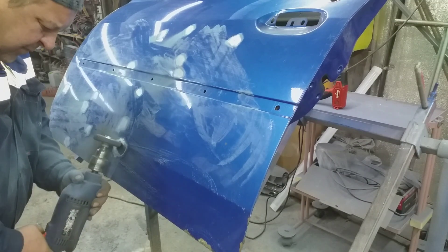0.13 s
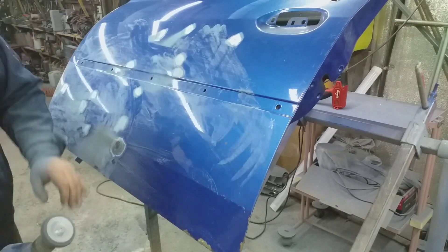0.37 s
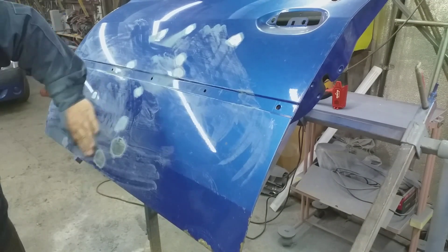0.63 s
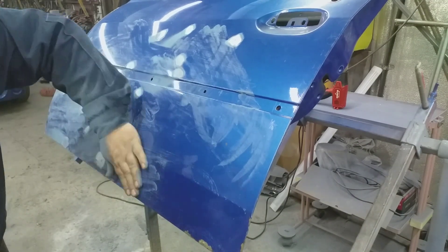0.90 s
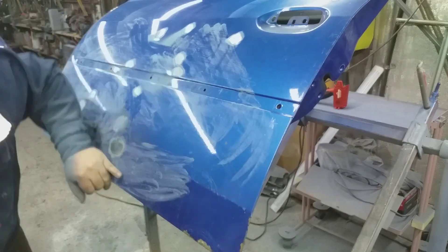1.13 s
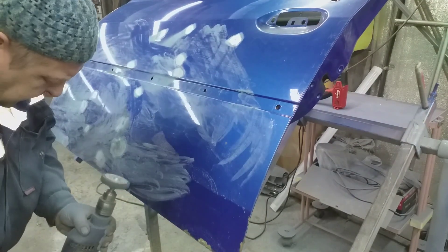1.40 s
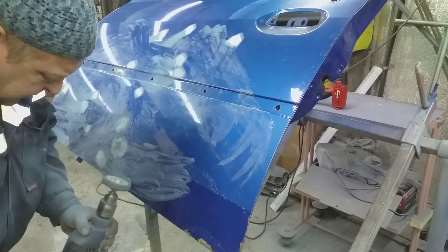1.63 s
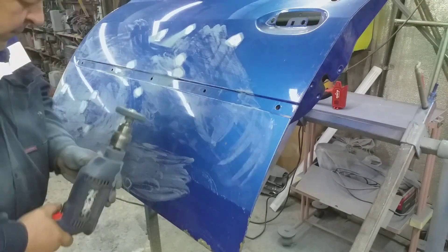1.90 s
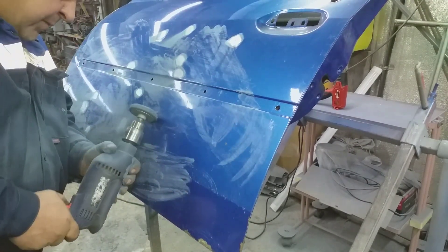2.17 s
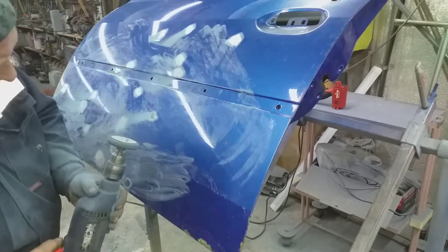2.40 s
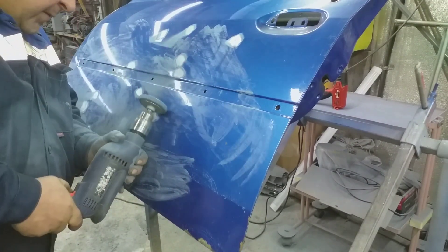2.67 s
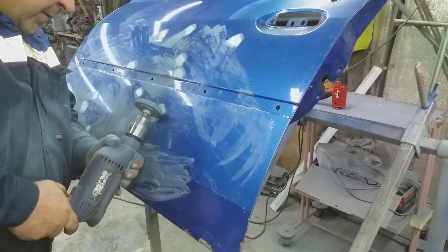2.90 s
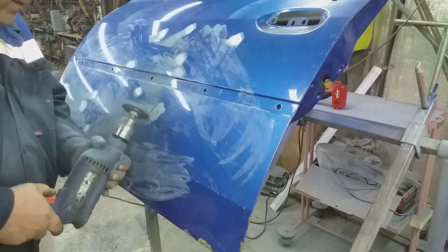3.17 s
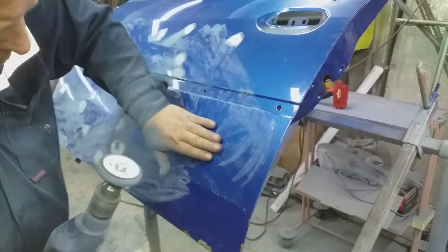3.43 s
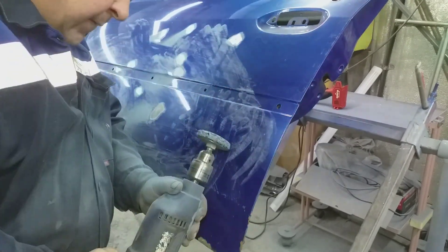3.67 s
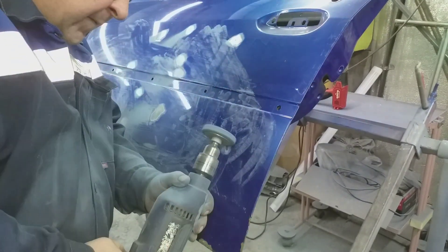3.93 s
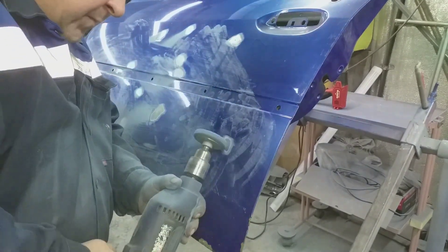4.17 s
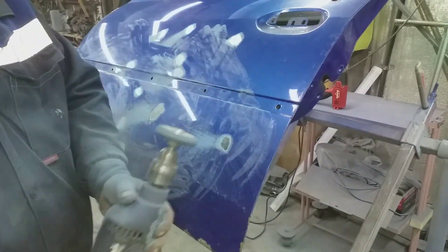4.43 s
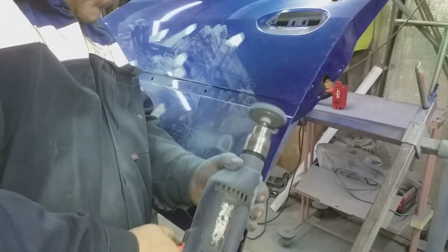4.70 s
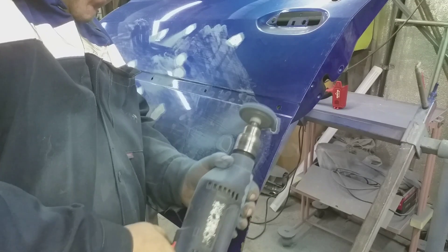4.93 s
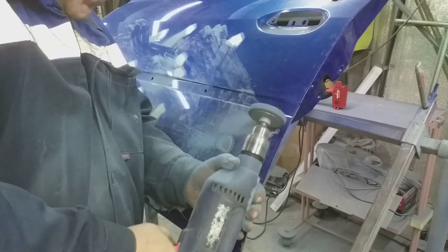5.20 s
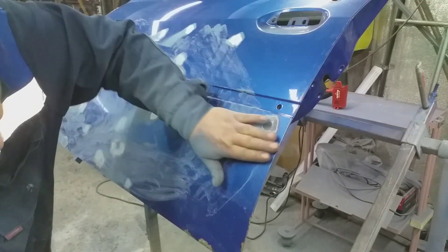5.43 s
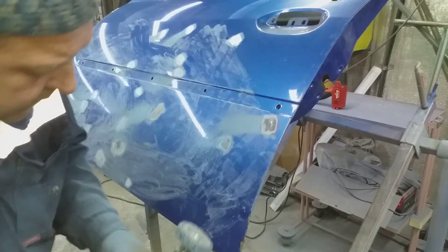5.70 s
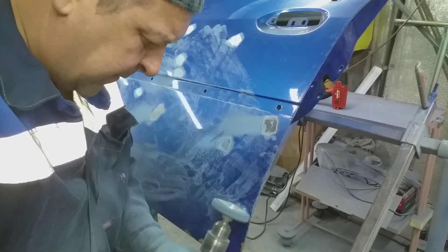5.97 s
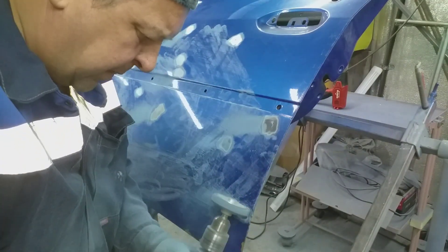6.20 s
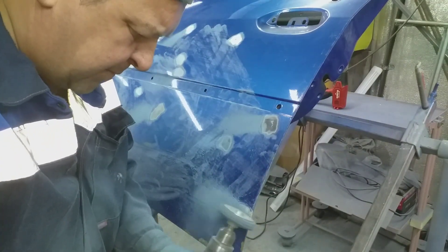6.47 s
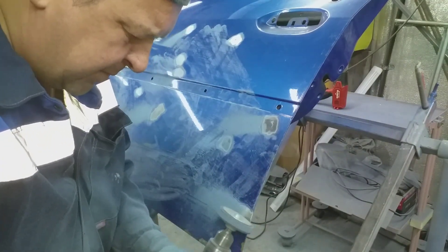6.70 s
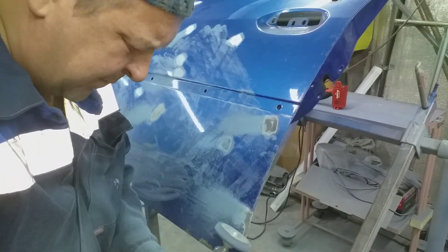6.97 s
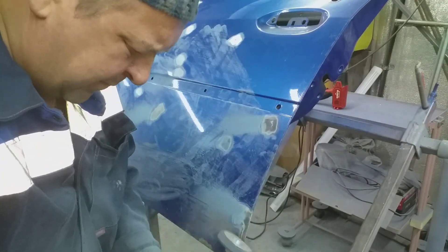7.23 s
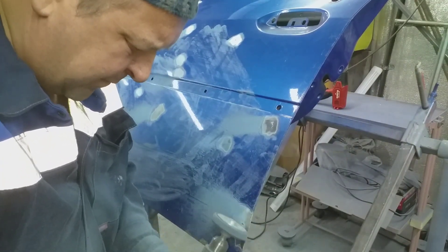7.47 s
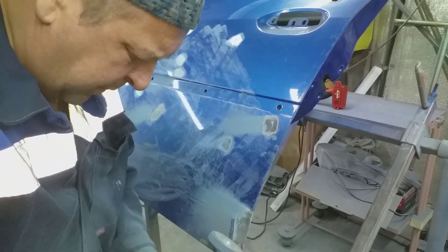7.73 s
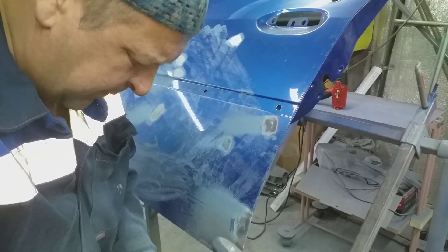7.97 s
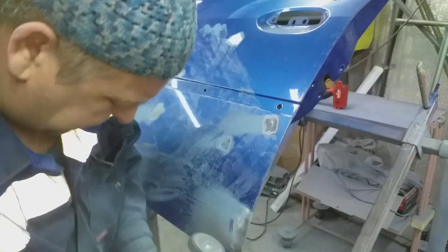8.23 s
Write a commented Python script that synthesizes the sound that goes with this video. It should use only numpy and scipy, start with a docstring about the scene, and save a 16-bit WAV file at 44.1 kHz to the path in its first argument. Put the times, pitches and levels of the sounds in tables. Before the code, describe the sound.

Close in a quiet workshop, an electric drill roars in short bursts, its fan hiss and thin high whistle surging at each start. The disc makes a steel door panel drum and rasp low underneath. After each release the pitch slides down and fades while a palm softly wipes dust. The later bursts are longer and closer together. The sped-up sound has a fine, rapid flutter.

```python
"""Hand drill grinding a door panel

A drill with an abrasive disc grinds spots on a steel door panel in short bursts, played faster than life.
Rotor: fan hiss through the housing, brush sizzle, blade whistle and gear tones that follow the speed. Panel:
modes and rasp driven by noise. Between bursts a palm wipes off dust and the motor blips once; trigger clicks;
workshop hush. The speed-up joins short slices of sound, so the level flutters at the slice rate."""
import sys
import numpy as np
from scipy import signal
from scipy.fft import rfft, irfft, next_fast_len
from scipy.io import wavfile
from scipy.ndimage import map_coordinates

SR = 44100
rng = np.random.default_rng(int(sys.argv[2]) if len(sys.argv) > 2 else 0)


def invert_db(level):
    """Linear amplitude ratio for a level in decibels (20 dB per decade), elementwise."""
    return 10 ** (np.asarray(level, dtype=float) / 20)


def generate_wav(signal):
    """Clip the signal to [-1, 1] and save it as 16-bit WAV at the path in sys.argv[1]."""
    frames = np.transpose(np.atleast_2d(signal))
    scaled = np.clip(frames, -1, 1) * 32767
    pcm = np.round(scaled).astype(np.int16)
    wavfile.write(sys.argv[1], SR, pcm)


N = 368669

# gear and commutator tones: cycles_per_turn, level_db (re power level), pitch_blur (share of pitch)
ROTOR_TONES = [(4, -6, .025), (8, -3, .02), (12, -5, .006), (48, -15, .002)]
# hiss coloured by the housing: freq_hz, density_db (relative)
HOUSING_SPECTRUM = [(760, -26), (1300, -5), (1380, -6), (1490, -5.5), (1890, -7), (2230, -7), (2690, -3),
                    (3740, -0.5), (4400, 1), (4820, 0), (5490, -1), (6010, -2), (7140, -3), (7810, -2.5),
                    (9200, -16.5), (12000, -48), (20200, -120)]
# housing resonances: freq_hz, width_hz, peak_gain_db (mean, re hiss)
HOUSING_RINGS = [(2800, 180, -8), (4350, 280, -7.5), (5210, 160, -13.5), (7860, 210, -10.5)]
# panel modes: freq_hz, width_hz (of each of two cascaded resonances), level_db, family (rounds to 0-3)
PANEL_MODES = [(162.1, 24, -7, 0), (204.8, 45, -1, -0.5), (257.8, 52, 1, 1), (336.3, 46.5, -4.5, 2),
               (382.4, 54.4, -2, 2), (433.3, 56, -2.5, 3), (503, 58, -4.5, 3), (655, 79, -11, 3),
               (939, 88, -24, 3)]
# spot under the disc, one row a touch: sway_db, then family_0_db .. family_3_db (relative balance)
TOUCH_SPOTS = [(-25.5, -9, -8.5, -5.5, -10.5), (-28, -15, -7.5, -3, -4), (-22, -12, -8.5, -4.5, -8.5),
               (-30, -11, -5.5, -10, -5.5), (-28, -8.5, -3.5, -4.5, -3.5), (-24.5, -11.5, -5.5, -6, -5),
               (-31, -10, -6, -3.5, -10.5), (-19, -6, -10, 0, -7.5), (-19, -7.5, -2, -6, -4),
               (-23, -6.5, -8.5, -8.5, -8), (-22, -7.5, -8, -3, -8), (-16.5, -6.5, -6.5, 0.5, -13.5),
               (-19, -15.5, -11, -3, -16.5), (-10.5, -7.5, -4.5, 0.5, -10), (-14.5, -7, -13, -1.5, -11.5),
               (-14, -3.5, -6.5, -4, -8.5), (-17.5, -7, -10, -3.5, -5.5), (-16, -7, -13, -7, -20)]
# brief disc snags: nominal_s, level_db (before trim), length_s
DISC_SNAGS = [(6.453, -13.5, 0.05), (6.561, -20, 0.025), (6.66, -13, 0.061), (7.221, -11, 0.045),
              (8.004, -9.5, 0.036)]
# palm strokes, plus one brief motor blip (the 5.759 s row): nominal_s, level_db (before low trim), treble_db
# (re level), length_s
PALM_AND_BLIP_SWELLS = [(0.662, -51.5, -11, 0.033), (0.698, -59, -3, 0.051), (0.742, -58.5, -11.5, 0.04),
                        (0.78, -58.5, -11.5, 0.048), (0.839, -50, -12, 0.051), (0.876, -54, -15.5, 0.056),
                        (0.921, -47.5, -15, 0.057), (0.97, -47.5, -9, 0.057), (1.019, -50, -13.5, 0.055),
                        (1.067, -51.5, -12, 0.046), (1.188, -56, -6.5, 0.027), (1.291, -60, -14, 0.019),
                        (3.552, -59, -6, .03), (3.636, -58, -20, 0.04), (3.698, -52, -25, 0.033),
                        (5.667, -55, -29, 0.024), (5.696, -46.5, -24, 0.026), (5.737, -51, -21, 0.038),
                        (5.759, -31.5, -25.5, 0.027)]
# trigger clicks: start_s, level_db (before trim), ring_hz
TRIGGER_CLICKS = [(3.647, -50, 3920), (3.7082, -39.5, 7560), (3.7172, -36, 2780)]
# noise spectra, each: freq_hz, density_db (relative)
RASP_SPECTRUM = [(290, -34.5), (500, -3), (574, -3), (641, 0.5), (827, -3.5), (924, -1.5), (1400, -11),
                 (2600, -10), (3380, -37), (5720, -120)]
RUMBLE_SPECTRUM = [(15, -60.5), (25, -44.5), (64, -6), (130, 9), (170, -29.5), (290, -120)]
SIZZLE_SPECTRUM = [(4940, -28.5), (8400, -0.5), (8820, -10), (9650, -1.5), (10100, 0), (10700, 1),
                   (12000, 2.5), (13300, 0), (15500, -8)]
PALM_SPECTRUM = [(180, -34), (300, 4), (381, -1), (591, -10), (1090, -0.5), (7320, 5), (8800, -20),
                 (11400, -35), (19400, -120)]
SHOP_SPECTRUM = [(24, -34), (40, -3.5), (106, -5), (184, -15.5), (611, -23.5), (2140, -23), (2480, -31),
                 (5000, -22.5), (15800, -46)]
# trigger pulls: squeeze_s, release_s, run_up_s, hiss_db (at cruise speed), surge_db, coast_hiss_db,
# stop_s (from the last speed point to STOP_DB down)
TRIGGER_PULLS = [(-.2, 0.303, .03, -30.5, 2.5, -42, 0.4742), (1.318, 1.804, .02, -30, 5.5, -36.5, 0.5),
                 (1.985, 2.36, 0.016, -30.5, 5, -40, 1.2), (2.52, 3.17, .01, -30.5, 7.5, -39, .425),
                 (3.71, 4.36, .035, -31, 3.5, -39.5, 1), (4.535, 5.253, 0.036, -27.5, 1.5, -37.5, 0.52),
                 (5.833, 6.478, .05, -29, 3, -35.5, .46), (6.555, 6.765, .035, -29.5, 4, -34, 1),
                 (6.795, 8.155, .035, -29, 2.5, -39.5, 0.9)]
# powered rotor, one curve a pull: time_s, blade_pass_hz, whistle_db (mean)
ROTOR_SPEEDS = [
    [(0, 9290, -51), (.2, 9200, -49), (.3, 9360, -54)],
    [(1.39, 14020, -41), (1.45, 12430, -45), (1.5, 10990, -46), (1.57, 10400, -48), (1.7, 10230, -49),
     (1.8, 10330, -50)],
    [(2.08, 11790, -42), (2.14, 11540, -44), (2.2, 11030, -47), (2.28, 10460, -50), (2.33, 10190, -51)],
    [(2.6, 12520, -44), (2.65, 10430, -52), (2.75, 11100, -49), (3.0, 10820, -47), (3.08, 10540, -50),
     (3.15, 9930, -49)],
    [(3.9, 9270, -49), (4.07, 9010, -52), (4.2, 9200, -52), (4.33, 9450, -54)],
    [(4.65, 13900, -46), (4.7, 11900, -42), (4.85, 11870, -38), (5, 11770, -41), (5.12, 11850, -39),
     (5.235, 11980, -43)],
    [(5.92, 10000, -45), (5.96, 11200, -41), (6.02, 11960, -37), (6.1, 11780, -38), (6.2, 11370, -38),
     (6.33, 10270, -43), (6.42, 10390, -41), (6.47, 10200, -52)],
    [(6.62, 10700, -40), (6.7, 10830, -39), (6.735, 10600, -42), (6.76, 10110, -50)],
    [(6.9, 9420, -50), (7, 9310, -46), (7.2, 9110, -46), (7.3, 9190, -50), (7.36, 9980, -45),
     (7.5, 10080, -42), (7.58, 9960, -47), (7.7, 10090, -42), (7.95, 10060, -49), (8.05, 9260, -51),
     (8.155, 8990, -55)],
]
# disc on steel: land_s, lift_s, drum_db, drum_change_db (until lift), rasp_db
DISC_TOUCHES = [(-.1, 0.301, -22.5, -4, -32), (1.33, 1.418, -25, 5, -40), (1.426, 1.796, -29, 2.5, -40),
                (2.014, 2.349, -21, -3, -36), (2.539, 2.618, -23, 2.5, -35), (2.622, 2.907, -22, -2.5, -38),
                (2.89, 3.171, -20.5, -3.5, -38), (3.727, 4.343, -20.5, -0.5, -35.5),
                (4.574, 4.858, -28, 3, -36), (4.852, 5.253, -28.5, 1.5, -35.5),
                (5.843, 6.204, -25.5, 1.5, -41), (6.217, 6.563, -26, -3.5, -39),
                (6.586, 6.761, -20.5, -5, -40.5), (6.77, 6.923, -29.5, 0, -37.5),
                (6.91, 7.31, -24, -1, -34.5), (7.31, 7.674, -23.5, -7.5, -39),
                (7.653, 8.171, -23.5, -4, -36), (8.225, 8.262, -39, 2.5, -58)]
# hand on the panel, plus the low thump of the motor blip (the 5.737 s row): start_s, peak_db (drumming drive),
# length_s
PANEL_NUDGES = [(.71, -73, .05), (3.559, -61.5, 0.034), (3.663, -61, 0.098), (5.585, -61, .04),
                (5.628, -62, .05), (5.737, -53, 0.047)]
# disc starting from rest bites gradually: start_s, time_constant_s
GRADUAL_BITES = [(1.33, 0.034), (3.72, 0.036), (5.85, 0.036)]

BLADES = 35
SLICE, FIRST_MIDDLE = 1024, 360  # samples between joins; sample at the middle of the first slice
TOP_HZ, SHOP_DB = 15830, -72.5
SPIN_UP_S, COAST_S, CUT_S, SURGE_S = .03, .31, .017, .031  # time constants
SLOWEST_HZ, CRUISE_HZ = 3000, 11340  # blade pass
RUN_UP_POWER, SURGE_HOLD_RUN_UPS = 2.15, 3.37
STOP_DB, STOP_POWER = 40, 3.04
AIR_SPEED_POWER, SIZZLE_EXTRA_POWER, IDLE_SIZZLE_POWER = .91, .61, .3  # exponents of speed
SIZZLE_DB, SIZZLE_SURGE_RATIO = -10, .91  # re powered hiss; multiple of the hiss surge in dB
IDLE_SIZZLE_DB, IDLE_DRUM_DB, IDLE_RASP_DB = -11.5, -23, -14  # re coasting hiss; sizzle at cruise speed
SHAKE_DRUM_DB, SHAKE_RASP_DB = -23, -16.5  # driven motor alone, re its hiss
IDLE_WHISTLE_DB, CLEAREST_HZ, CLEAR_OCTAVES = -6.5, 6800, .6  # re coasting hiss, at the clearest pitch
LAND_S, LIFT_S = .019, .0048  # time constants of touch power


def unit(x):
    """Scaled to rms 1."""
    return x / np.sqrt(np.mean(x ** 2) + 1e-20)


def decibels(x):
    """Amplitude in dB."""
    return 20 * np.log10(x + 1e-6)


def wobble(rate_hz):
    """Smooth random curve, rate_hz knots a second."""
    knots = rng.standard_normal(int(N * rate_hz / SR) + 4)
    return map_coordinates(knots, [np.arange(N) * rate_hz / SR])


def half_sine(t_s, start_s, length_s):
    """Swell from 0 to 1 and back."""
    return np.sin(np.pi * np.clip((t_s - start_s) / length_s, 0, 1))


def filtered(x, response):
    """x through a complex frequency response."""
    size = next_fast_len(N + SR // 4)
    return irfft(rfft(x, size) * response(np.fft.rfftfreq(size, 1 / SR)), size)[..., :N]


def resonance(f_hz, center_hz, width_hz):
    """One causal resonance of peak gain 1."""
    return 1j * f_hz * width_hz / (center_hz ** 2 - f_hz ** 2 + 1j * f_hz * width_hz)


def noise(spectrum):
    """Noise of rms 1, coloured by (Hz, dB) points on a log frequency axis."""
    hz, db = np.transpose(spectrum)
    white = rng.standard_normal(N)
    return unit(filtered(white, lambda f: invert_db(np.interp(np.log(f + 1), np.log(hz + 1), db))))


def sliced(level_db):
    """Level held through each slice and cross-faded into the next."""
    place = np.clip(np.arange(N) - FIRST_MIDDLE, 0, N) / SLICE
    first = place.astype(int)
    held_db = np.append(level_db[FIRST_MIDDLE::SLICE], level_db[-1])
    held_db = held_db + rng.normal(0, .59, len(held_db))  # slices come from moments apart
    fade = np.sin(np.pi / 2 * (place - first)) ** 2
    return held_db[first] * (1 - fade) + held_db[first + 1] * fade


def workshop():
    """Steady hush of the room: coloured noise."""
    return invert_db(SHOP_DB) * noise(SHOP_SPECTRUM)


def motor():
    """Pulls run up with a surge, hold, cut and coast: blade pitch, powered amplitudes, idle amplitude."""
    t_s = np.arange(N) / SR
    blade_hz = np.full(N, float(SLOWEST_HZ))
    hiss, sizzle, whistle, idle = np.zeros((4, N))
    for pull, speeds in zip(TRIGGER_PULLS, ROTOR_SPEEDS):
        squeeze_s, release_s, run_up_s, hiss_db, surge_db, coast_db, stop_s = pull
        point_s, point_hz, whistle_db = np.transpose(speeds)
        since_s = np.clip(t_s - squeeze_s, 0, None)
        after_s = np.clip(t_s - release_s, 0, None)
        slowing_s = np.clip(t_s - point_s[-1], 0, None)  # speed sags as the finger eases
        powered_hz = np.interp(t_s, point_s, point_hz)
        driven_hz = np.maximum(powered_hz * np.exp(-slowing_s / COAST_S), SLOWEST_HZ)
        blade_hz = blade_hz + (driven_hz - blade_hz) * (1 - np.exp(-since_s / SPIN_UP_S))

        rise = 1 - np.exp(-since_s / run_up_s)
        power = rise ** RUN_UP_POWER * np.exp(-after_s / CUT_S)
        surge_fall_s = np.clip(since_s - SURGE_HOLD_RUN_UPS * run_up_s, 0, None)
        surge = surge_db * np.exp(-surge_fall_s / SURGE_S)
        speed = powered_hz / CRUISE_HZ
        air = power * speed ** AIR_SPEED_POWER
        hiss += air * invert_db(hiss_db + surge)
        brushes = invert_db(hiss_db + SIZZLE_DB + SIZZLE_SURGE_RATIO * surge)
        sizzle += air * brushes * speed ** SIZZLE_EXTRA_POWER
        whistle += power * invert_db(np.interp(t_s, point_s, whistle_db))

        loss_db = STOP_DB * np.minimum(slowing_s / stop_s, 2) ** STOP_POWER
        coasting = invert_db(coast_db - loss_db) * (1 - np.exp(-after_s / CUT_S))
        idle = idle * (1 - rise) + coasting
    return blade_hz, hiss, sizzle, whistle, idle


def fan_hiss(hiss_db):
    """Turbulent fan air coloured by the housing, whose shell rings."""
    flow = noise(HOUSING_SPECTRUM)
    air = flow
    for hz, width_hz, gain_db in HOUSING_RINGS:
        ring = filtered(flow, lambda f: resonance(f, hz, width_hz))
        air = air + invert_db(gain_db + 3 * wobble(5)) * ring  # the grip damps the shell unevenly
    air = invert_db(.89 * wobble(300)) * air
    return invert_db(hiss_db + .49 * wobble(25)) * unit(air)


def brush_sizzle(sizzle_db):
    """Brush noise in the treble."""
    return invert_db(sizzle_db + 1.2 * wobble(22)) * noise(SIZZLE_SPECTRUM)


def rotor_tones(blade_hz, sizzle_db, whistle_db):
    """Blade whistle plus gear and commutator tones, locked to the rotor angle."""
    middle = np.round((np.arange(N) - FIRST_MIDDLE) / SLICE) * SLICE + FIRST_MIDDLE
    blade_hz = blade_hz[np.clip(middle, 0, N - 1).astype(int)]  # pitch held per slice: glides step
    turns = np.cumsum(blade_hz * (1 + .0022 * wobble(60))) / BLADES / SR
    tones = invert_db(whistle_db + 1.5 * wobble(30)) * np.sin(2 * np.pi * BLADES * turns)
    power_db = sizzle_db + 2 * np.minimum(sizzle_db + 47, 0)  # gone when coasting
    power_db = power_db + 20 * np.log10(blade_hz / 10500)
    for order, level_db, blur in ROTOR_TONES:
        flicker_db = 3 * wobble(40)
        slip_turns = np.cumsum(blur * wobble(150) * blade_hz) / BLADES / SR  # gear play blurs pitch
        tone = np.sin(2 * np.pi * order * (turns + slip_turns))
        tones = tones + invert_db(power_db + level_db + flicker_db) * tone
    return tones


def contact():
    """Disc touches: powers of drumming and rasp, and power shares of sway and mode families."""
    t_s = np.arange(N) / SR
    drum, rasp, colour = np.zeros(N), np.zeros(N), np.zeros((5, N))
    for touch_row, (sway_db, *family_db) in zip(DISC_TOUCHES, TOUCH_SPOTS):
        land_s, lift_s, drum_db, change_db, rasp_db = touch_row
        landing = (1 - np.exp(-np.clip(t_s - land_s, 0, None) / LAND_S)) ** 2
        touch = landing * np.exp(-np.clip(t_s - lift_s, 0, None) / LIFT_S)
        progress = np.clip((t_s - land_s) / (lift_s - land_s), 0, 1)
        drum += touch * invert_db(drum_db + change_db * progress) ** 2
        rasp += touch * invert_db(rasp_db) ** 2
        share = invert_db(np.array(family_db)) ** 2
        colour += np.outer([invert_db(sway_db) ** 2, *share / share.sum()], touch + 1e-9)
    for start_s, slow_s in GRADUAL_BITES:
        growth = 1 - np.exp(-np.clip(t_s - start_s, 0, None) / slow_s)
        bite = np.where(t_s < start_s, 1, growth) ** 4.8
        drum, rasp = drum * bite, rasp * bite
    return drum, rasp, colour / colour[1:].sum(axis=0)


def panel_mode(hz, width_hz):
    """One mode shaken by noise; the disc pressing on the sheet shifts it, so its pitch wavers."""
    shaken = filtered(rng.standard_normal(N), lambda f: resonance(f, hz, width_hz) ** 2)
    mode = signal.hilbert(shaken, next_fast_len(N))[:N]
    bend_cycles = np.cumsum(.04 * hz * wobble(7)) / SR
    mode = mode * np.exp(2j * np.pi * bend_cycles)
    return unit(mode.real / np.abs(mode) ** .5)  # constant drive evens the swing out


def panel(drum_db, rasp_db, colour_db):
    """Disc shakes every mode; the spot touched weights the families. Rasp is scraping noise."""
    sway_db, *family_db = colour_db
    drum = invert_db(sway_db) * noise(RUMBLE_SPECTRUM)
    for hz, width_hz, level_db, family in PANEL_MODES:
        drift_db = 1.5 * wobble(8)
        gain = invert_db(level_db + family_db[round(family)] + drift_db)
        drum = drum + gain * panel_mode(hz, width_hz)
    chatter = wobble(25)  # the disc skips on the steel
    scrape = invert_db(rasp_db + 1.2 * chatter) + snags()
    return invert_db(drum_db + 1.32 * chatter) * drum + scrape * noise(RASP_SPECTRUM)


def palm_and_motor_blip():
    """Palm strokes and one brief motor blip: swells of soft noise."""
    t_s = np.arange(N) / SR
    low, high = np.zeros(N), np.zeros(N)
    for nominal_s, level_db, treble_db, length_s in PALM_AND_BLIP_SWELLS:
        swell = half_sine(t_s, nominal_s - .0087, length_s)
        low += invert_db(level_db - 10) * swell
        high += invert_db(level_db + treble_db) * swell
    return low * noise(PALM_SPECTRUM) + high * noise(SIZZLE_SPECTRUM)


def nudges():
    """Hand nudges and the motor blip's thump on the panel: drumming amplitude in short swells."""
    t_s = np.arange(N) / SR
    return sum(invert_db(db) * half_sine(t_s, start_s, length_s) for start_s, db, length_s in PANEL_NUDGES)


def trigger():
    """Trigger clicks: decaying sine plus noise."""
    length = 600  # samples
    ticks = np.zeros(N + length)
    u_s = np.arange(length) / SR
    for start_s, level_db, ring_hz in TRIGGER_CLICKS:
        ring = np.sin(2 * np.pi * ring_hz * u_s) + .3 * rng.standard_normal(length)
        ticks[round(start_s * SR):][:length] += invert_db(level_db - 2 - 60 * u_s / .0082) * ring
    return ticks[:N]


def snags():
    """Disc snags and scrapes briefly: added rasp amplitude."""
    t_s = np.arange(N) / SR
    return sum(invert_db(level_db - 18.5) * half_sine(t_s, nominal_s - .0063, length_s)
               for nominal_s, level_db, length_s in DISC_SNAGS)


def scene():
    """Drill, panel and hand over the workshop hush."""
    blade_hz, hiss, sizzle, whistle, idle = motor()
    drum, rasp, colour = contact()
    idle_sizzle = invert_db(IDLE_SIZZLE_DB) * idle * (blade_hz / CRUISE_HZ) ** IDLE_SIZZLE_POWER
    hiss_db = sliced(decibels(hiss + idle))
    sizzle_db = sliced(decibels(sizzle + idle_sizzle))
    drum_db = sliced(decibels(np.sqrt(drum) + invert_db(SHAKE_DRUM_DB) * hiss + invert_db(IDLE_DRUM_DB) * idle))
    rasp_db = sliced(decibels(np.sqrt(rasp) + invert_db(SHAKE_RASP_DB) * hiss + invert_db(IDLE_RASP_DB) * idle))
    # the housing lets the coasting whistle out best near CLEAREST_HZ
    clearness = np.exp(-(np.log2(blade_hz / CLEAREST_HZ) / CLEAR_OCTAVES) ** 2)
    whistle_db = decibels(whistle + invert_db(IDLE_WHISTLE_DB) * idle * clearness)

    drill = fan_hiss(hiss_db) + brush_sizzle(sizzle_db) + rotor_tones(blade_hz, sizzle_db, whistle_db)
    door = panel(decibels(invert_db(drum_db) + nudges()), rasp_db, decibels(np.sqrt(colour)))
    return (drill + door + palm_and_motor_blip() + trigger() + workshop())[None]


def band_limit(x):
    """A steep low-pass at the top of the band."""
    return signal.sosfilt(signal.butter(12, 17030, fs=SR, output="sos"), x)


def record(dry):
    """Unlike slices lose power where they cross-fade; joins line up on the bass, which dips less."""
    join = np.cos(2 * np.pi * (np.arange(N) - FIRST_MIDDLE) / SLICE)
    bass = filtered(dry, lambda f: 1 / (1 + (f / 650) ** 4))
    joined = bass * np.sqrt(1 + .14 * join) + (dry - bass) * np.sqrt(1 + .3 * join)
    mix = filtered(joined, lambda f: f < TOP_HZ)
    return band_limit(mix)


dry = scene()
out = record(dry)
generate_wav(out)
```